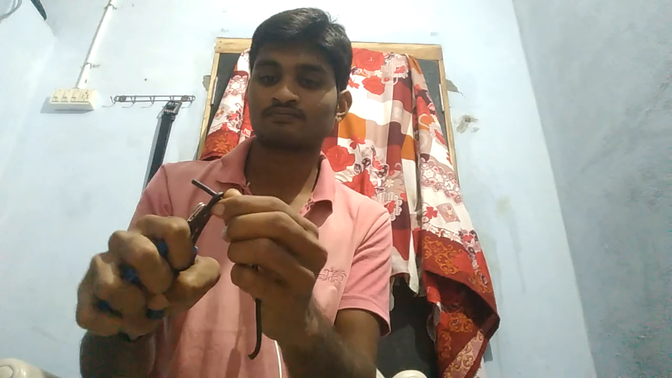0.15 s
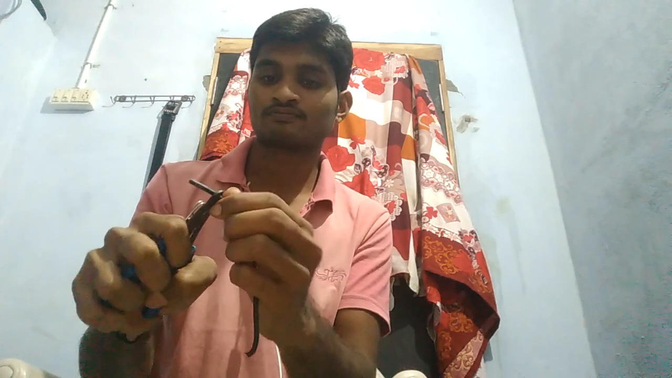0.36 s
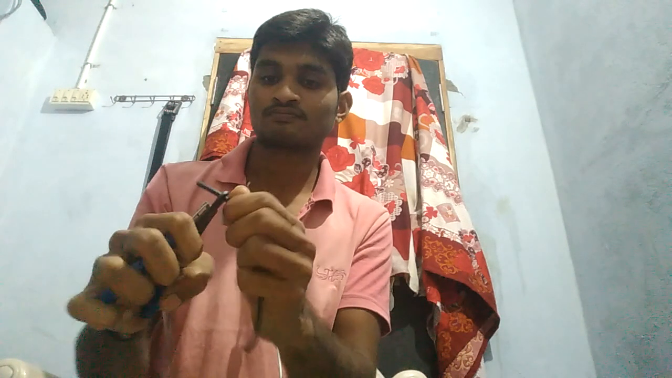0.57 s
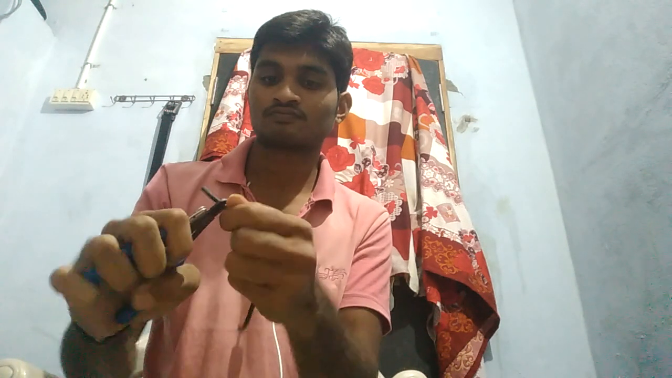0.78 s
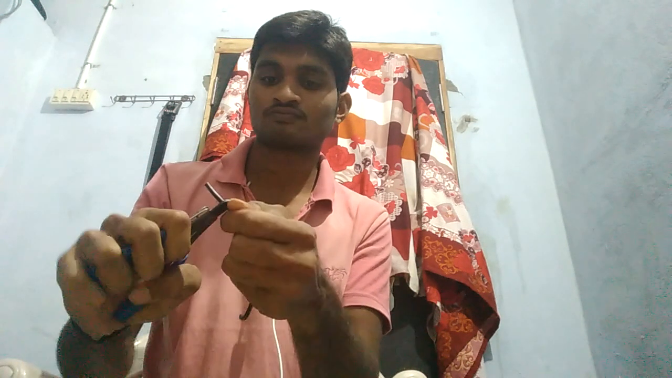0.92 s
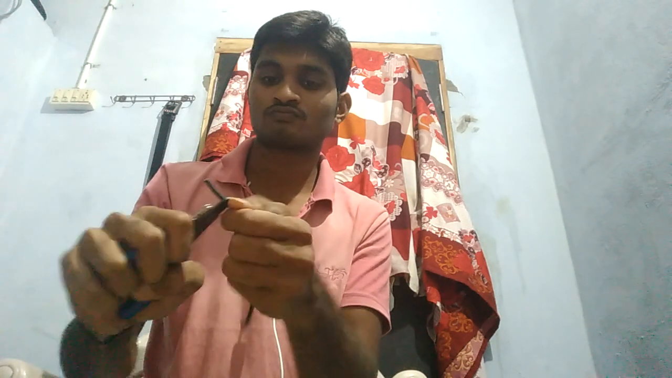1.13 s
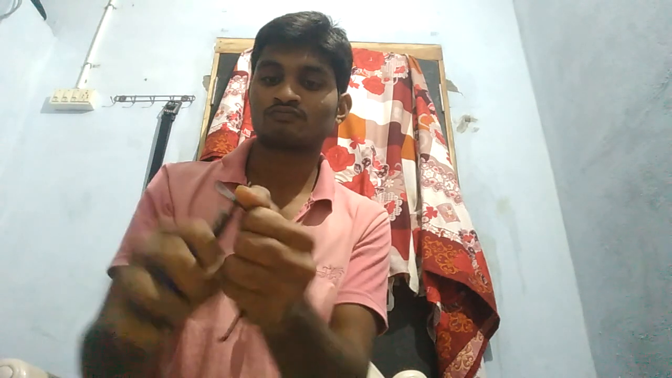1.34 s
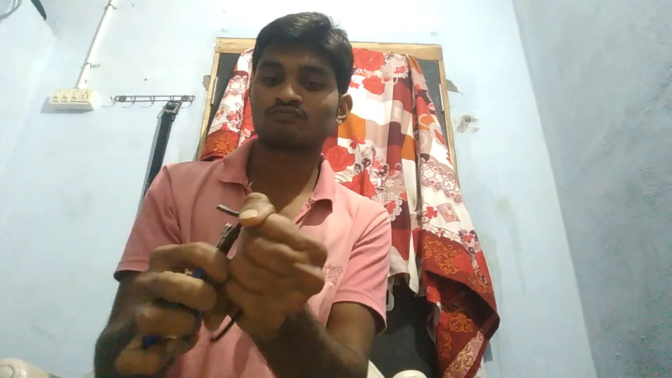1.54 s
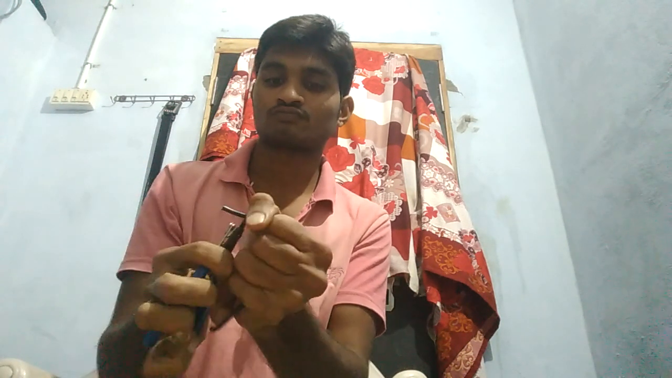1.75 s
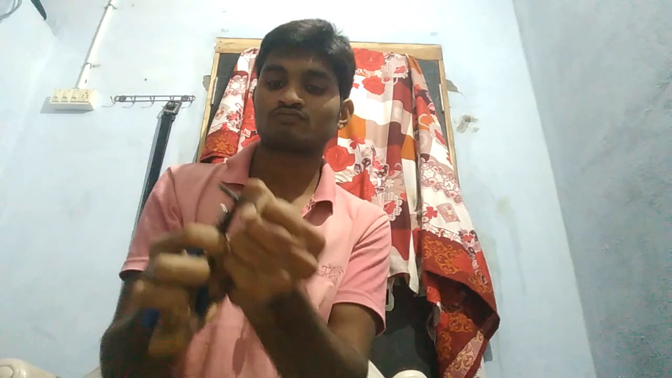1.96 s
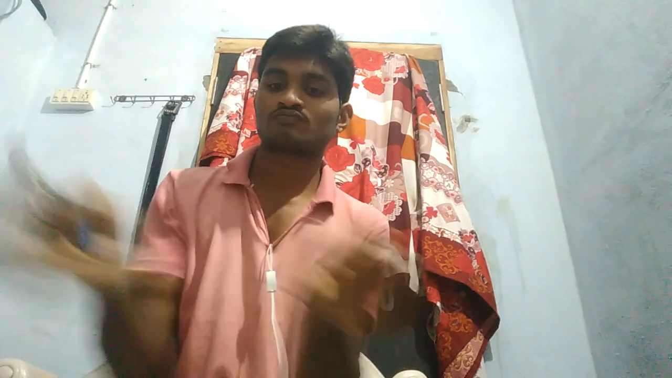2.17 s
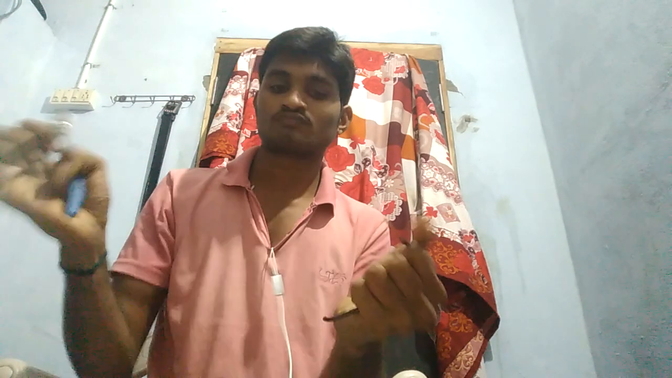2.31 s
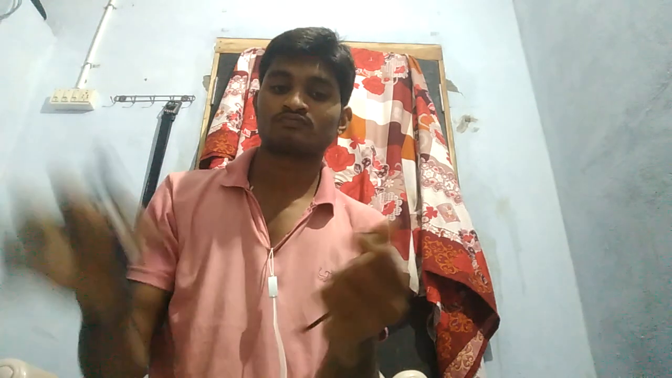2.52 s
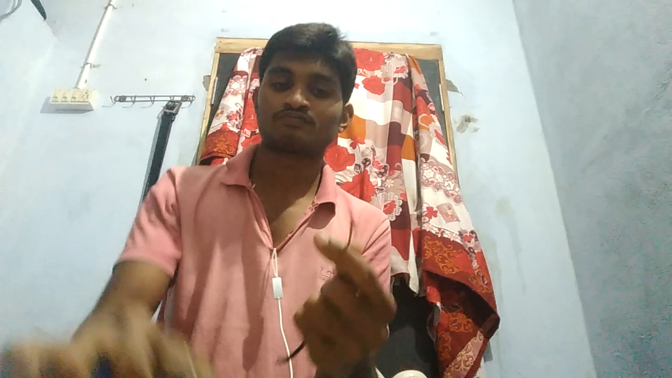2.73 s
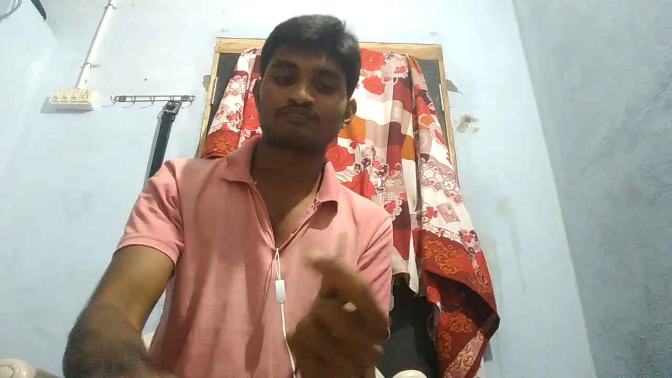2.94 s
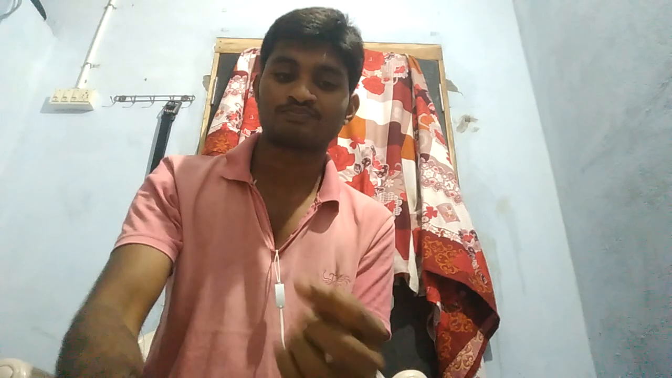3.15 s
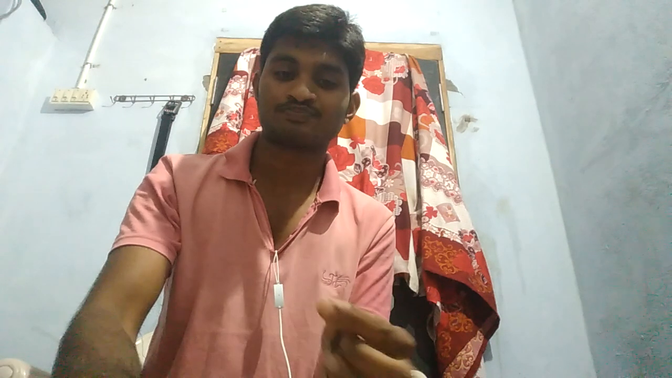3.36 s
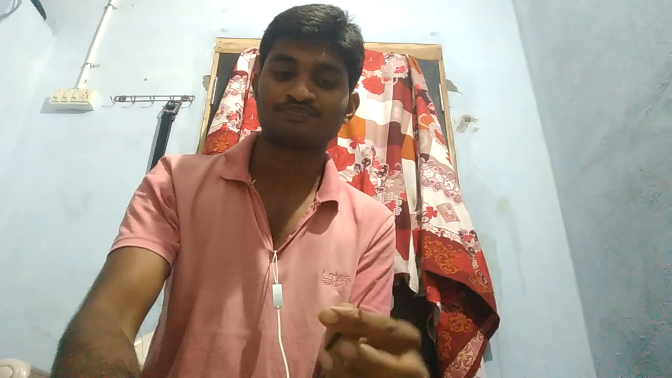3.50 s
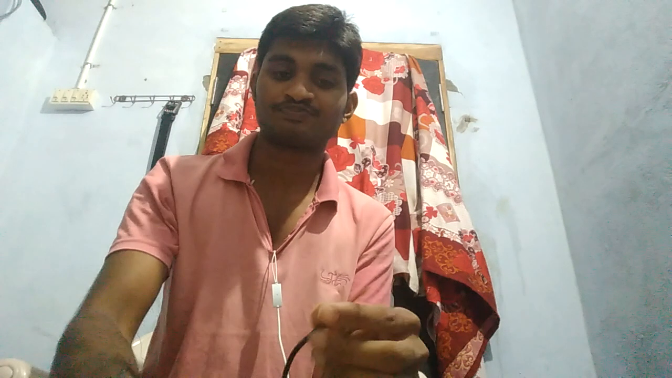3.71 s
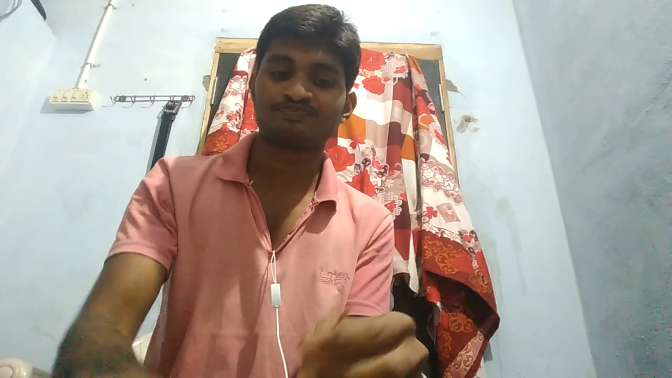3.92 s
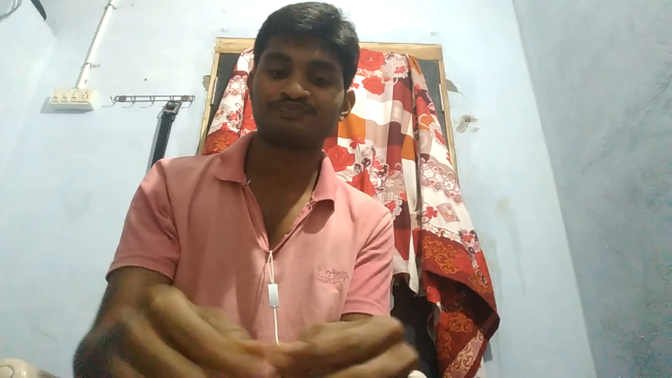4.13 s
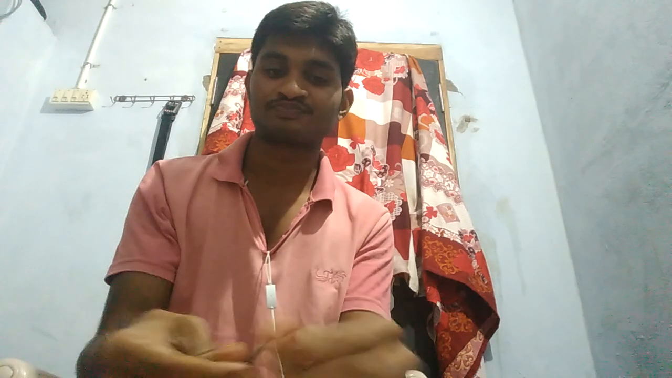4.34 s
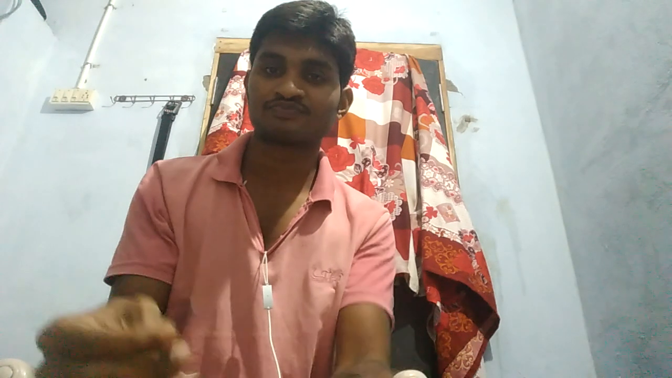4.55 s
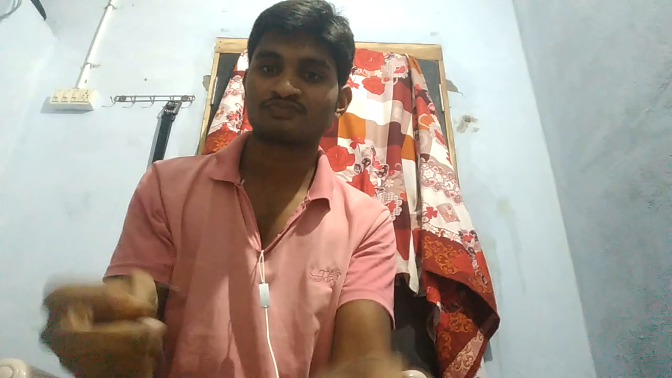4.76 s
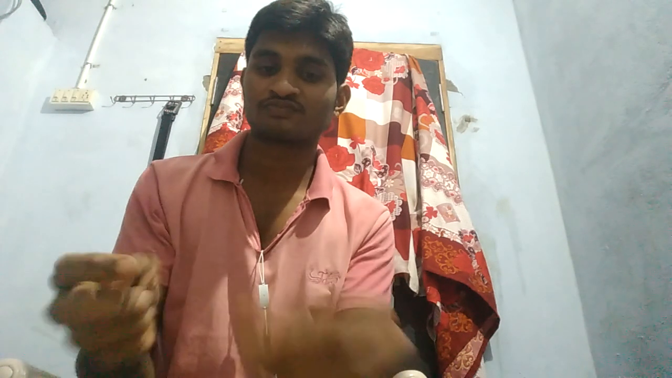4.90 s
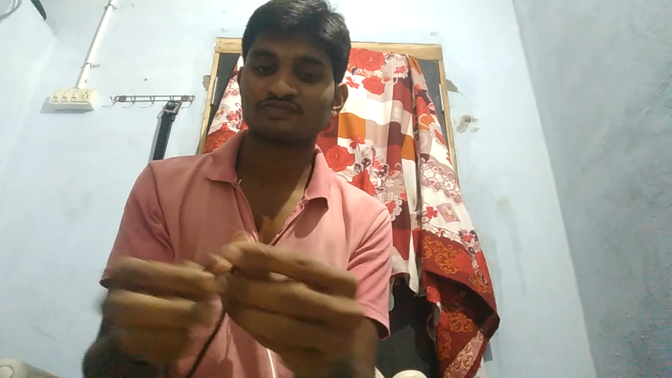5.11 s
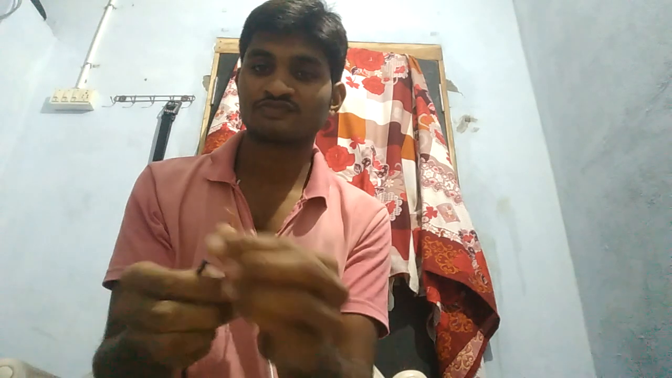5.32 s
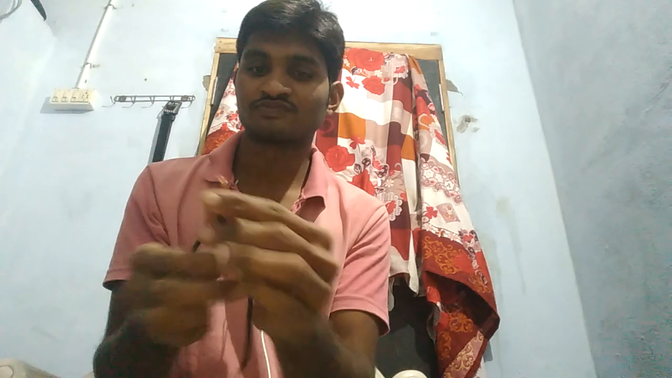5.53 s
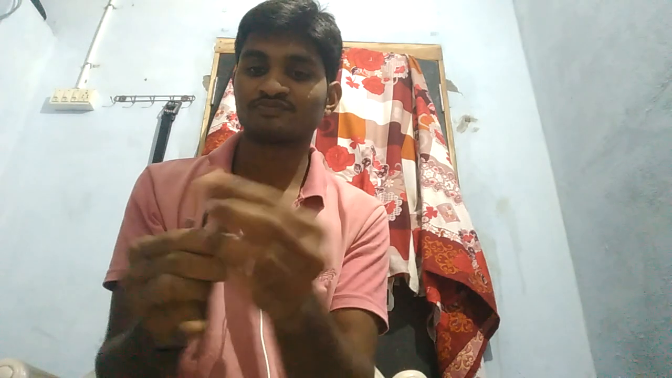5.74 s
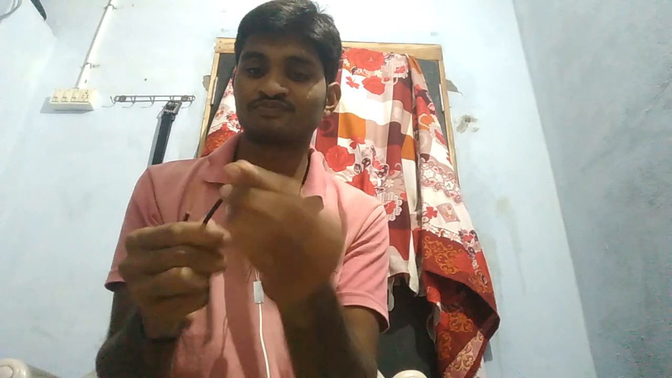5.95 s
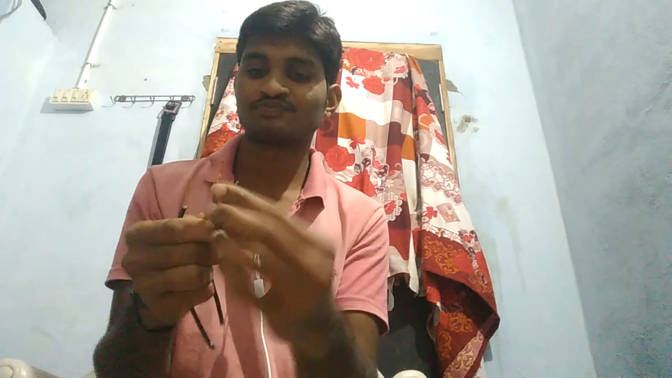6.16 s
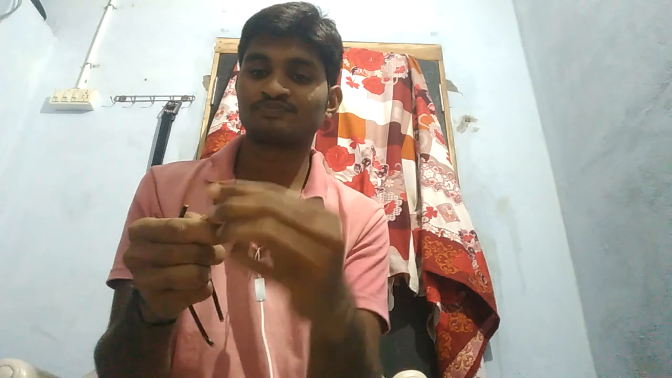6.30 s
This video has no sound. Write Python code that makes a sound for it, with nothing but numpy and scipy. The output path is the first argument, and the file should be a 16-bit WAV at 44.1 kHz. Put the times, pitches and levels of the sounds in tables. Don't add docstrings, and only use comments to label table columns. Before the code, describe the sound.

Quiet isolated ticks from a stiff plier pivot, then a tight burst of crackles as wire sleeve tears and steel jaws clap. Loud wooden desk knocks, metallic rattle and gritty sliding follow, picked up through the desk carrying the stereo microphones. It ends with tiny dry strand clicks and soft rubbing over room hiss, with a low far vehicle swelling faintly.

```python
import sys
import numpy as np
from scipy import signal
from scipy.fft import rfft, irfft
from scipy.io import wavfile
from scipy.ndimage import uniform_filter1d

SR = 44100
rng = np.random.default_rng(int(sys.argv[2]) if len(sys.argv) > 2 else 0)


def waveform_to_disk(signal):
    frames = np.transpose(np.atleast_2d(signal))
    scaled = np.clip(frames, -1, 1) * 32767
    samples = np.round(scaled).astype(np.int16)
    wavfile.write(sys.argv[1], SR, samples)


def volts_from_decibels(level):
    exponent = np.asarray(level, float) / 20
    return 10 ** exponent


N = 285319

# (frequency [Hz], density [dB per Hz])
ROOM_TONE_SPECTRUM = [(20, -15.5), (60, -20.5), (77, -24.5), (131, -14.5), (160, -21), (305, -19),
                      (342, -20.5), (634, -23.5), (2120, -28.5), (3420, -27), (14700, -24), (15850, -20.5),
                      (16000, -61)]
# (frequency [Hz], likeness [0-1])
STEREO_LIKENESS = [(60, 0.11), (240, 0.38), (950, 0.14), (3770, 0.019), (15000, 0.03)]
# (time [s], level [dB])
HISS_GAIN = [(0.0, -73.5), (2.1, -73.5), (2.4, -66.5), (3.1, -66), (4.1, -65), (4.8, -67.5), (5.1, -67),
             (6.47, -67)]
# (frequency [Hz], width [Hz], share removed [0-1])
DESK_ECHO_DIPS = [(1860, 600, 0.34), (3650, 450, 0.48), (6146, 290, 0.6), (13600, 790, 0.34)]

# (frequency [Hz], level [dB], t60 [s])
DESK_MODES = [(88, -17, 0.33), (130.2, -16, 0.11), (156, -0.5, 0.13), (196, -8, 0.18), (221, 0, 0.088),
              (278, -1, 0.097), (348, -1.5, 0.098), (416.7, -6, 0.19), (496.4, -0.5, 0.05),
              (556, -17.5, 0.098), (646.4, -11, 0.16), (736.4, -1.5, 0.12), (831, 1, 0.087),
              (913, 1.5, 0.041), (995, 2, 0.062), (1163, -2, 0.072), (1240, -26.5, 0.56), (1362, -1, 0.051),
              (1417, -8, 0.07), (1480, -28, .06)]
# (time [s], peak [dB])
DESK_LURCHES = [
    (3.098, -31),
    (3.251, -23.5),
    (3.587, -37),
    (3.829, -40),
    (3.955, -22),
    (4.081, -31.5),
    (4.635, -23.5),
    (4.681, -29),
]
# (time [s], peak [dB], lows under
# 500 Hz [dB], strongest pitch [Hz], lasting [0.67 = modes' own decay, less is damped, more rings longer])
DESK_KNOCKS = [(1.738, -47, -8, 582, 0.17), (2.22, -36, -14.5, 350, 0.87),
               (3.099, -30.5, 0.5, 122, 0.65), (3.164, -25.5, -1.5, 395, 0.27),
               (3.25, -10, 2, 221, 0.65), (3.367, -22.5, -33, 170, 0.68), (3.396, -23.5, -22, 557, 0.4),
               (3.413, -33.5, -16, 581, 0.49), (3.445, -32.5, -16, 579, 0.96),
               (3.589, -14, -6, 190, 0.45), (3.823, -41, 5, 169, 1), (3.837, -37, -5, 110, 0.41),
               (3.843, -37.5, 3.5, 170, 0.8), (3.87, -39.5, 5.5, 202, 0.61),
               (3.958, -5.5, -3.5, 179, 0.45), (3.973, -5, -5, 221, 0.48), (3.988, -9, 2.5, 221, 0.37),
                (4.007, -13, -2.5, 155, 0.39), (4.044, -22, -5, 167, 0.55), (4.081, -17.5, -5, 354, 0.43),
                (4.145, -30, 0.5, 170, 0.47), (4.172, -22, -4.5, 268, 0.37), (4.221, -36, 7, 175, 0.24),
                (4.24, -23.5, -2.5, 203, 0.22), (4.286, -37.5, 3.5, 168.6, 0.57),
                (4.631, -18.5, -3.5, 593, 0.41), (4.64, -26.5, 5, 225, 0.81), (4.682, -24.5, -8, 236, 0.89),
                (4.756, -25.5, -10, 424, 0.98), (5.362, -58, -21, 164.5, 0.86)]

# (time [s], length [s], weight on the desk [dB], edge scratch [dB], surface hiss [dB])
SKID_SLIDES = [(2.213, 0.26, -58, -48, -40.5), (2.794, 0.1, -82, -80, -30),
               (3.364, 0.12, -36.5, -28.5, -59), (3.442, 0.058, -54, -33, -48),
               (3.582, 0.039, -31, -49, -73), (4.65, 0.086, -32, -46, -31.5), (4.673, 0.041, -26, -35, -37),
               (4.757, 0.11, -43.5, -27.5, -49), (5.768, 0.035, -92.5, -89, -50),
               (5.853, 0.057, -91, -90.5, -45), (6.101, 0.049, -91, -80, -41)]
# (middle [s], length [s], weight
# on the desk or low swell [dB], edge scratch [dB], surface hiss [dB])
SWELLING_RUBS = [(2.64, 0.17, -80, -94, -52.5), (3.17, 0.19, -42, -54.5, -40), (3.72, 0.72, -48, -64, -51),
                 (3.88, 0.37, -51.5, -61.5, -54), (4.028, 0.17, -32.5, -48.5, -73),
                 (4.269, 0.19, -41.5, -59.5, -57.5), (4.592, 0.46, -88.5, -87, -51.5),
                 (4.751, 0.17, -36, -43, -36.5), (4.861, 0.13, -56, -85, -44.5),
                 (5.496, 0.7, -65.5, -95, -95), (5.293, 0.97, -89, -72.5, -61),
                 (5.897, 0.94, -84.5, -70.5, -57.5)]
# (frequency [Hz], density [dB per Hz])
DRAG_HISS_SPECTRUM = [(4000, -20.5), (6500, -20.5), (8000, -14), (10500, 0), (13000, -3.5), (15500, -27),
                      (16500, -30)]
# (time [s], length [s], centre [Hz],
# width [Hz], level [dB])
NOISE_RASPS = [(4.762, 0.097, 8270, 1400, -31), (4.756, 0.13, 2230, 220, -45),
               (4.756, 0.15, 3400, 190, -55.5), (4.645, 0.13, 10800, 1500, -41.5),
               (4.85, 0.092, 10500, 2500, -42), (1.741, 0.083, 2500, 1100, -59),
               (1.736, 0.025, 2170, 540, -47), (2.4, .9, 13700, 2500, -58), (2.7, 0.049, 12600, 3200, -44),
               (2.797, 0.11, 15200, 1200, -40), (2.797, 0.11, 13000, 2500, -43),
               (2.4, 0.23, 1960, 300, -54), (4.63, 0.092, 4200, 980, -42),
               (4.756, 0.066, 4800, 610, -38.5), (3.252, 0.089, 4400, 1600, -35.5),
               (3.252, 0.043, 2770, 400, -34), (3.367, 0.11, 2900, 1300, -42),
               (3.96, 0.071, 4500, 2000, -34.5), (1.391, .08, 12500, 5000, -51),
               (.929, .12, 13500, 4000, -59), (.929, 0.14, 8300, 500, -59), (2.22, 0.1, 15000, 2000, -39),
               (6.102, .04, 14000, 3000, -41.5), (5.853, 0.041, 13600, 3000, -55)]

# (time [s], frequency [Hz], t60 [ms], peak
# [dB], left-right [dB])
SHORT_PINGS = [(3.2505, 2684, 23, -14, 7), (3.2507, 3010, 17, -13, -3.5), (3.2505, 4820, 18, -17, 0),
               (3.2506, 5500, 17, -13.5, 3), (3.2505, 6990, 20, -17, 0), (3.264, 4970, 10, -36, 0),
               (3.264, 6900, 12, -33, 0), (3.367, 4040, 10, -16, 1), (3.366, 6360, 8, -24, 3),
               (3.3775, 10200, 10, -22, -5), (3.4245, 8900, 9.2, -28, -3), (3.4462, 7200, 15, -16, 4),
               (3.4462, 3750, 10, -21, 2), (3.4655, 10500, 10, -26, -3), (3.9575, 7060, 14, -14, -3),
               (3.9572, 9300, 11, -16, -8), (3.997, 7500, 8, -22, 0), (3.997, 10500, 7.3, -25, 2),
               (4.009, 4620, 15, -28, 2), (4.6395, 6600, 12, -31, -4), (4.741, 11500, 9, -31, -6),
               (4.762, 8400, 13, -26, -6), (4.7625, 3000, 12, -27, -7), (4.774, 8500, 12, -28, -6),
               (4.78, 11000, 10, -36, -6), (4.794, 8200, 12, -28, -9), (4.873, 8800, 10, -30.5, -9),
               (2.2345, 7800, 12, -39, 0), (2.796, 1834, 56, -35, 9), (2.808, 4440, 25, -43, 0),
               (2.8228, 1860, 30, -38, 2), (3.837, 910, 25, -35.5, -3), (1.391, 8460, 90, -54, 0),
               (1.391, 4180, 90, -53, 2), (.929, 4140, 90, -52, 0), (.929, 6000, 60, -53, 0),
               (5.768, 11000, 8, -40, -4), (5.778, 10800, 14, -37, -4), (5.3, 11800, 10, -36, -4),
                 (6.0785, 12900, 6, -36, -2), (5, 11000, 14, -31, -4), (6.114, 13200, 12, -36, -3),
                 (3.589, 970, 50, -22.5, 0), (3.589, 400, 60, -24, -0.5), (3.252, 275.4, 80, -16, 2),
                 (4.636, 280, 80, -25, 1), (3.9575, 5600, 12, -22, -2), (4.08, 12000, 6, -35, -2)]

# (frequency [Hz], level [dB], t60 [s])
GRIPPED_MODES = [(1010, -26, .02), (2090, -14, .025), (4200, -7, .016), (4540, -10, .008), (6000, -8, .012),
                 (8230, 0, .012), (8480, -3, .01), (10900, -3, .007), (11400, 0, .008), (12900, -6, .007),
                 (14400, 0, .007), (15600, -3, .006)]
# (frequency [Hz], level [dB], t60 [s])
LOOSE_MODES = [(1780, -15, .035), (3100, -30, .03), (4470, -25, .03), (6282, 0, .036), (8740, -9, .015),
               (11200, -5, .008), (12000, -6, .008)]
# (time [s], peak [dB])
PIVOT_SLIPS = [(0.0199, -45), (0.0374, -48), (0.0524, -50), (0.0664, -47), (0.0867, -45), (0.1136, -42),
               (0.1371, -47), (0.156, -42.5), (0.177, -46), (0.197, -45), (0.2124, -50), (0.2304, -51),
               (0.0006, -37.5), (0.9292, -36.5), (0.9372, -41), (0.946, -43), (0.9525, -37.5),
               (0.9655, -43), (0.9815, -46), (1.3894, -31), (1.397, -35), (1.402, -41), (1.4115, -41),
               (1.4185, -37)]
# (time [s], length [s], rate [slips per s], peak [dB])
PIVOT_CREAKS = [
    (0.988, .05, 170., -53),
    (1.425, .03, 150., -51),
]
# (time [s], peak [dB])
JAW_CLAPS = [
    (2.794, -1.5),
    (2.8228, -12),
]

# (time [s], peak [dB], body below 4 kHz [dB], left-right [dB], rattle [ms])
BITE_CRACKS = [(0.639, -41.5, -25, -15, 5.2), (0.9285, -47, -13.5, -8, 1.3), (1.39, -38, -39, -8, 1.1),
               (1.7382, -43.5, -0.5, 0, 1.7), (1.9812, -47, -9, -8, 1.3), (2.1907, -36, -24, -4, 1.1),
               (2.2186, -27, -21, 5, 1.3), (2.2216, -24.5, -11.5, 2, 1.3), (2.224, -28, -17, -2, 1.8),
               (2.2296, -14, -24.5, 3, 1.8), (2.2347, -22, -17.5, -5, 3.3), (2.5148, -39.5, -25, -10, 1.2),
               (2.7947, -13, -31.5, 5, 1.4)]
# (time [s], peak [dB], body below 4 kHz [dB], left-right [dB], rattle [ms])
LAID_CRACKS = [(3.1, -30.5, -22, -1, 1.1), (3.25, -2, -11, -1.5, 2.6), (3.264, -18.5, -7, -10, 1.5),
               (3.3659, -5, -41, -0.5, 1.4), (3.3787, -33.5, 5.5, -4, 1.8), (3.3949, -19.5, -10, -4, 1.2),
               (3.399, -26, -6, -5, 1.1), (3.4103, -19.5, -29, -24, 0.69), (3.415, -13.5, -14, 4, 2.4),
               (3.424, -35, -20, 1, 1.1), (3.4456, -2, -32, -1.5, 2.2), (3.585, -32.5, 1, -9, 4.6),
               (3.7456, -30, -20, -13, 1.4)]
# (time [s], peak [dB], body below 4 kHz [dB], left-right [dB], rattle [ms])
SHOVED_CRACKS = [(3.956, -3.5, -12.5, 4.5, 1.4), (3.9583, -6, -20.5, -5.5, 1.5),
                 (3.9623, -20.5, -16, -13, 1.6), (3.9769, -12.5, -12, -9, 1.7), (3.9814, -6, -14.5, 3, 3.8),
                 (3.9968, -22, -2.5, 3, 1.5), (4.08, -32, -0.5, -1, 0.64), (4.171, -36, -3, -2, 2.3),
                 (4.2386, -40.5, -2.5, -11, 1.8), (4.6277, -15, -17.5, -14, 0.64),
                 (4.632, -20.5, -13, 8, 3), (4.639, -16, -13.5, -7.5, 4.3), (4.6825, -32, 5, 1, 2.9),
                 (4.7557, -24, -9.5, -9, 1.4), (4.7615, -21, -8, -4, 1.6), (4.8722, -29, -19, -2, 1.2)]
# (time [s], peak [dB], body below 4 kHz [dB], left-right [dB], rattle [ms])
FLICK_CRACKS = [(5.2814, -40, -15, -11, 1.4), (5.3275, -39.5, -10.5, -2, 1.25), (5.3617, -36, -7, -2, 0.85),
                (5.6584, -41.5, -12.5, -7, 1.1), (5.768, -50.5, -17.5, 0, 1.2),
                (5.7737, -38, -21.5, -15.5, 1.1), (5.843, -41.5, -27, -3, 1.1),
                (5.8538, -27, -30, -8.5, 1.5), (6.0785, -34, -21, -4, 1.5), (6.102, -30, -20.5, 4.5, 1.1),
                (6.1061, -33.5, -23.5, -10.5, 1.4), (6.1103, -43.5, -33.5, -8, 1.1)]
BITE_CENTRES = [9350, 12500, 13500, 10600, 9650, 11800, 10000, 9500, 10300, 10800, 7300, 11850, 10950]
LAID_CENTRES = [10000, 9900, 9500.0, 9300, 9900.0, 9100.0, 9900.0, 9200, 9300, 9200.0, 10100, 7800, 10700.0]
SHOVED_CENTRES = [8800.0, 9850, 10500.0, 11020, 11200, 9700.0, 9900, 11800, 9700, 10300, 10100, 10700,
                  10100.0, 10700.0, 8700, 9800]
FLICK_CENTRES = [11600, 11000, 10600.0, 12200, 11400.0, 13700.0, 11230, 11500, 13360, 10920, 11100.0,
                 11700.0]
CRACK_WIDE = [
    -18,
    -11,
    -12,
    -29,
]

JOLT_S, FADE_DB = 0.0044, 24


def at_hz(points, hz):
    table_hz, level = np.array(points).T
    return np.interp(np.log(hz + 1), np.log(table_hz), level)


def band(x, low_hz, high_hz, order=2):
    edges_hz = [low_hz, min(high_hz, .45 * SR)]
    return signal.sosfilt(signal.butter(order, edges_hz, "band", fs=SR, output="sos"), x)


def rms_one(x):
    return x / np.sqrt(np.mean(x ** 2) + 1e-20)


def peak_at(sound, db):
    return sound * volts_from_decibels(db) / np.abs(sound).max(axis=1).mean()


def add(track, s, sound, pan_db=0):
    start = round(s * SR)
    panned = sound * volts_from_decibels(np.array([[.5], [-.5]]) * pan_db)
    track[:, start:start + sound.shape[1]] += panned[:, :N - start]


def coloured(spectrum):
    hz = np.fft.rfftfreq(N, 1 / SR)
    mid, side = rfft(rng.standard_normal((2, N)))
    alike = np.clip(at_hz(STEREO_LIKENESS, hz), 0, 1)
    pair = np.sqrt(1 + alike) * mid + np.sqrt(1 - alike) * side * np.array([[1], [-1]])
    return irfft(pair * volts_from_decibels(at_hz(spectrum, hz)), N)


def room_tone():
    t = np.arange(N) / SR
    hiss_db = np.interp(t, *np.transpose(HISS_GAIN))
    tone = coloured(ROOM_TONE_SPECTRUM)
    tone = band(tone, 29, 21000, order=3) / np.std(band(tone, 3400, 6800, order=4))

    traffic = coloured([(20, 0.005), (20000, 0.0044)])
    rumble = rms_one(band(traffic, 32, 55))
    drone = rms_one(band(traffic, 170, 390))
    drone_db = hiss_db.max() + 2.3 * (hiss_db - hiss_db.max()) - 1

    passing_s, rise_s = 6.04, 0.8
    passing = volts_from_decibels(-72) * np.exp(-((t - passing_s) / rise_s) ** 4)
    engine = volts_from_decibels(4.5) * np.sin(2 * np.pi * 48.4 * t)
    hum = passing * (engine + volts_from_decibels(-1.5) * rms_one(band(traffic, 18, 75.6)))

    steady = volts_from_decibels(hiss_db + 3.5) * tone + volts_from_decibels(drone_db + 1.0) * drone
    return steady + (volts_from_decibels(hiss_db + 1.5) + passing) * rumble + hum


def room(x):
    t60_s, top_t60_s, top_hz, level_db = 0.21, 0.062, 14300, -13
    t = np.arange(round(.5 * SR)) / SR
    noise = rng.standard_normal((2, len(t)))
    dull = band(noise, 900, top_hz) * volts_from_decibels(-60 * t / t60_s)
    top = band(noise, top_hz, 15000) * volts_from_decibels(-60 * t / top_t60_s)
    tail = (dull + top) * np.clip((t - .002) / 0.00073, 0, 1)
    tail = volts_from_decibels(level_db) * tail / np.sqrt(np.sum(tail ** 2, axis=1, keepdims=True))
    return signal.fftconvolve(x, tail, axes=1)[:, :N]


def desk_echo(x):
    for hz, width_hz, share in DESK_ECHO_DIPS:
        resonance = signal.lfilter(*signal.iirpeak(hz, hz / width_hz, fs=SR), x)
        x = x - np.clip(share, 0, 1) * resonance
    return x


def desk_ring(low_db, centre_hz):
    hz, level_db, t60 = np.transpose(DESK_MODES)
    t = np.arange(7000)[:, None] / SR
    near_db = 8 * np.exp(-(np.log2(hz / centre_hz) / .45) ** 2)
    spot = rng.standard_normal(len(hz))
    port = rng.standard_normal((2, len(hz)))
    sign = np.where(port * hz > 400, -1, 1)
    coupling = volts_from_decibels(level_db + near_db + 1.2 * spot + 2.32 * port) * sign
    build_up = 1 - np.exp(-t * hz / 0.88)
    waves = volts_from_decibels(-60 * t / t60) * np.sin(2 * np.pi * hz * t + 3 * spot) * build_up
    low = hz < 500
    lows = peak_at(coupling[:, low] @ waves.T[low], low_db)
    highs = peak_at(coupling[:, ~low] @ waves.T[~low], 0.0067)
    return lows + highs


def lurches():
    out, t = np.zeros((2, N)), np.arange(7000) / SR
    noise = rng.standard_normal((len(DESK_LURCHES), 2, len(t)))
    sways = band(noise * volts_from_decibels(-60 * t / 0.18), 50, 125)
    sways = sways + .05 * sways[:, ::-1]
    fade_out = np.minimum((t[-1] - t) / .03, 1)
    for (s, db), sway in zip(DESK_LURCHES, sways):
        add(out, s, peak_at(sway * fade_out, db - 0.5))
    return out


def knocks():
    out, t, taps = np.zeros((2, N)), np.arange(7000) / SR, DESK_KNOCKS
    noise = rng.standard_normal((len(taps), 2, len(t)))
    buzzes = band(noise, 213, 1113, order=4) * volts_from_decibels(-60 * t / 0.34)
    fade_out = np.minimum((t[-1] - t) / 0.021, 1)
    for (s, db, low_db, centre_hz, lasting), buzz in zip(taps, buzzes):
        damping = volts_from_decibels(-60 * t / 0.24 * (1 / max(lasting, .2) - 1.5))
        ring = desk_ring(low_db + 5.0, centre_hz) * damping
        rough_tail = peak_at(buzz * np.minimum(t / 0.0012, 1), -4.0) * np.sqrt(damping)
        add(out, s, volts_from_decibels(db) * (ring + rough_tail) * fade_out, pan_db=2)
    return out


def grit(spread_db, per_s):
    present = rng.random(N) < per_s / SR
    sizes = volts_from_decibels(spread_db * np.minimum(rng.exponential(1, N), 4)) * present
    return np.sqrt(uniform_filter1d(sizes ** 2, size=40) + 0.018) * rng.standard_normal((2, N))


def slides():
    t, gains = np.arange(N) / SR, np.zeros((3, N))
    for s, length, *db in SKID_SLIDES:
        after = np.maximum(t - s, 0)
        shape = np.minimum(after / JOLT_S, 1) * volts_from_decibels(-FADE_DB * after / length)
        gains += volts_from_decibels(np.array(db))[:, None] * shape
    for s, length, *db in SWELLING_RUBS:
        gains += volts_from_decibels(np.array(db))[:, None] * volts_from_decibels(-FADE_DB * (2 * (t - s) / length) ** 2)
    return gains


def drag_hiss():
    hz = np.fft.rfftfreq(N, 1 / SR)
    colour = volts_from_decibels(at_hz(DRAG_HISS_SPECTRUM, hz))
    hiss = rms_one(irfft(rfft(grit(spread_db=1.5, per_s=4000.0)) * colour, N))
    edges_hz = [3500, 7500, 9200, 10600, 12200, 14000, 17000]
    patchy = np.zeros((2, N))
    for low_hz, high_hz in zip(edges_hz, edges_hz[1:]):
        patches_db = 3 * rms_one(band(rng.standard_normal(N), 6.4, 60))
        patchy += band(hiss, low_hz, high_hz) * volts_from_decibels(patches_db)
    return rms_one(patchy)


def drags():
    coarse = grit(spread_db=6.0, per_s=330.0)
    ring = desk_ring(low_db=4.0, centre_hz=202)
    rumble = rms_one(signal.fftconvolve(coarse, ring, axes=1)[:, :N])
    buzz = rms_one(band(band(grit(spread_db=2.5, per_s=430.0), 330, 690), 260, 1440))
    grains = grit(spread_db=0.0, per_s=800.)
    scratch = rms_one(band(grains, 1126, 1540) + volts_from_decibels(-4) * band(grains, 1800, 3200))
    hiss = drag_hiss() * volts_from_decibels(np.array([[-2.5], [2.5]]))

    flutter_s, flutter_db = 0.0082, 0.5
    flutter = rms_one(uniform_filter1d(rng.standard_normal(N), size=round(flutter_s * SR)))
    weight, edge, surface = slides() * volts_from_decibels(flutter_db * flutter)
    return weight * (rumble + volts_from_decibels(-6.0) * buzz) + edge * scratch + surface * hiss


def rasps():
    out, t = np.zeros((2, N)), np.arange(13000) / SR
    for s, length, hz, width_hz, db in NOISE_RASPS:
        flicker_db = 2.2 * rms_one(band(rng.standard_normal(len(t)), 30, 250))
        noise = rng.standard_normal((2, len(t))) * volts_from_decibels(flicker_db)
        singing = rms_one(band(noise, hz - width_hz / 2, hz + width_hz / 2))
        fade = np.minimum(t / JOLT_S, 1) * volts_from_decibels(db - FADE_DB * t / length)
        add(out, s, singing * fade, pan_db=-5.0)
    return out


def pings():
    out, t, touches = np.zeros((2, N)), np.arange(2600) / SR, SHORT_PINGS
    phases = rng.random((len(touches), 2, 2, 1))
    for (s, hz, t60_ms, db, pan_db), phase in zip(touches, phases):
        lower = np.sin(2 * np.pi * (hz * .97 * t + phase[0]))
        upper = np.sin(2 * np.pi * (hz * 1.03 * t + phase[1]))
        decay = volts_from_decibels(-60000 * t / max(t60_ms, 3)) * np.minimum(t / .0004, 1)
        add(out, s, peak_at((lower + upper) * decay, db), pan_db)
    return out


def struck_steel(hits, modes, trim_db, scatter_db, rough):
    out, t = np.zeros((2, N)), np.arange(2600) / SR
    hz, level_db, t60 = np.transpose(modes)[:, :, None]
    for s, db in hits:
        weight = rng.standard_normal((2, len(modes)))
        phase = rng.random((2, len(modes), 1))
        chatter = rms_one(uniform_filter1d(rng.standard_normal((len(modes), len(t))), size=100))
        tones = np.sin(2 * np.pi * (hz * t + phase))
        waves = volts_from_decibels(level_db - 60 * t / t60) * tones * (1 + rough * chatter)
        sound = (waves * volts_from_decibels(scatter_db * weight)[:, :, None]).sum(axis=1)
        add(out, s + 0.00089, peak_at(sound * np.minimum(t / 0.000079, 1), db + trim_db))
    return out


def creak_slips():
    rows = []
    for s, length, per_s, db in PIVOT_CREAKS:
        jitter, spread = rng.standard_normal((2, 40))
        after = np.cumsum(np.exp(.15 * jitter) / per_s)
        after = after - after[0]
        spread_db = np.append(2, 2.5 * spread[1:])
        for wait, offset_db in zip(after, spread_db):
            if wait < length:
                rows.append((s + wait, db + offset_db - 24 * wait))
    return rows


def pivot():
    hits = creak_slips() + PIVOT_SLIPS
    return struck_steel(hits, GRIPPED_MODES, trim_db=2.0, scatter_db=1.5, rough=0.5)


def jaws():
    return struck_steel(JAW_CLAPS, LOOSE_MODES, trim_db=-9.5, scatter_db=-5.0, rough=0.078)


def cracks():
    out, t = np.zeros((2, N)), np.arange(800) / SR
    kinds = [BITE_CRACKS, LAID_CRACKS, SHOVED_CRACKS, FLICK_CRACKS]
    rows = sum(kinds, [])
    centres_hz = np.concatenate([BITE_CENTRES, LAID_CENTRES, SHOVED_CENTRES, FLICK_CENTRES])
    wide_db = np.repeat(CRACK_WIDE, [len(kind) for kind in kinds])

    decay_ms = np.maximum(np.array(rows)[:, 4, None, None], .2)
    spike = np.exp(-((t - .0008) / 0.0002) ** 2)
    rattle = .7 * np.exp(-1000 * t / decay_ms) * np.minimum(t / .001, 1)
    spits = rng.standard_normal((len(rows), 2, len(t))) * (spike + rattle)
    wides = band(spits, 4000, 16800) * volts_from_decibels(wide_db)[:, None, None]
    bodies = band(spits + .6 * spits[:, ::-1], 750, 3150)

    for row, centre_hz, spit, wide, body in zip(rows, centres_hz, spits, wides, bodies):
        s, db, body_db, pan_db, _ = row
        bright = wide + band(spit, centre_hz / 1.09, centre_hz * 1.09, order=1)
        add(out, s, peak_at(bright, db + 6) + peak_at(body, db + body_db + 9.5), pan_db)
    return out


def scene():
    airborne = band(pivot() + jaws(), 840, 23000) + cracks()
    through_desk = knocks() + lurches() + drags() + rasps()
    near = desk_echo(airborne + room(airborne) + through_desk)
    return room_tone() + near + pings()


def top_cut(x):
    return signal.sosfilt(signal.butter(12, 17100, fs=SR, output="sos"), x)


def record(dry):
    rounded = .8 * np.tanh(dry / .8)
    low_pass = signal.cheby2(12, 90, 17300, fs=SR, output="sos")
    return top_cut(signal.sosfilt(low_pass, rounded))


dry = scene()
out = record(dry)
waveform_to_disk(out)
```